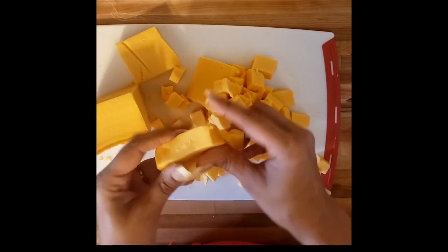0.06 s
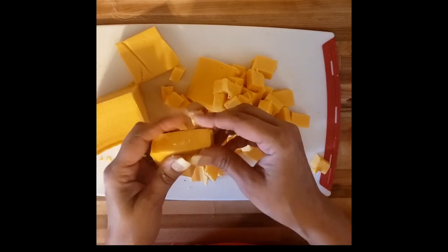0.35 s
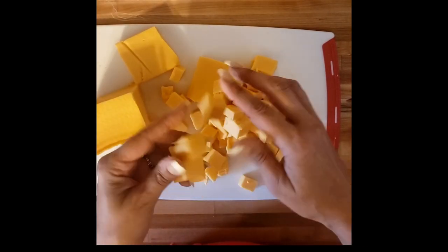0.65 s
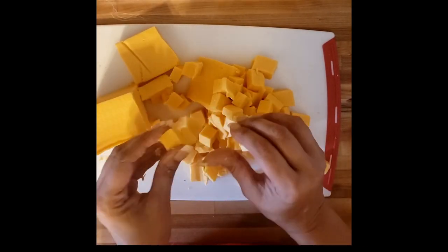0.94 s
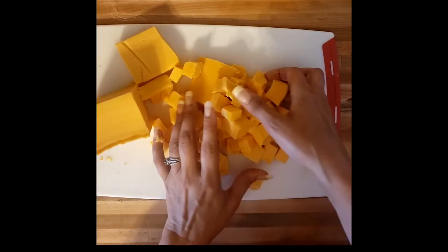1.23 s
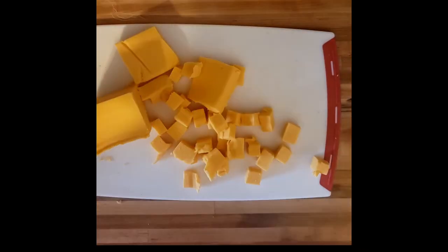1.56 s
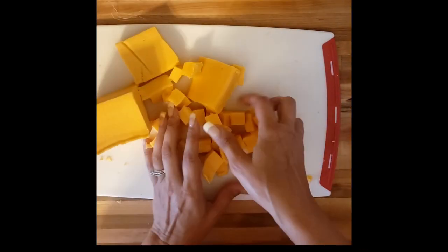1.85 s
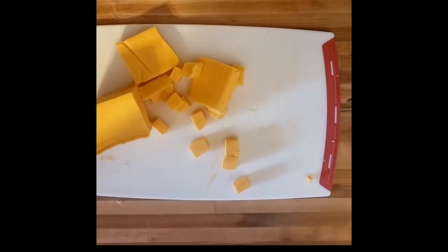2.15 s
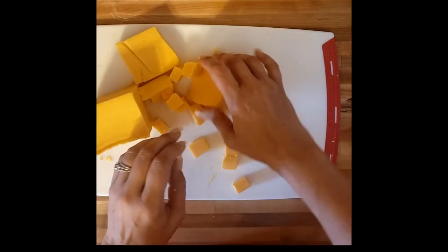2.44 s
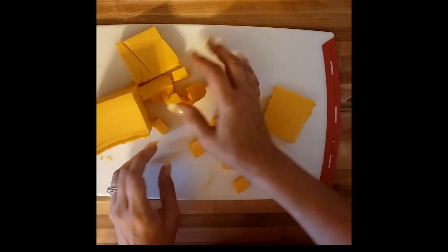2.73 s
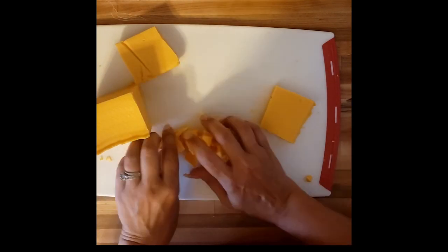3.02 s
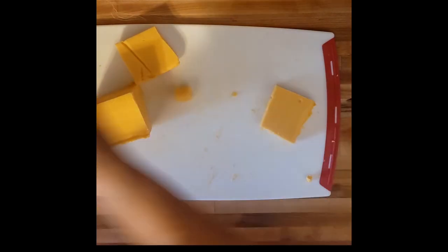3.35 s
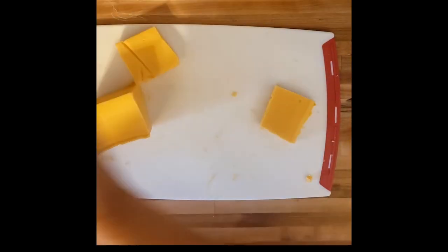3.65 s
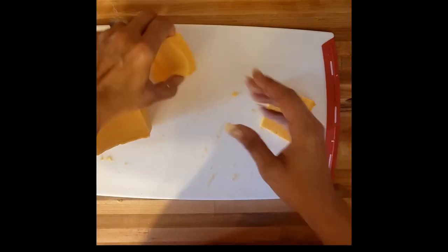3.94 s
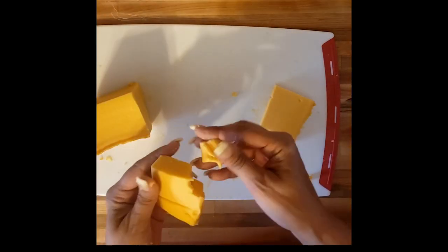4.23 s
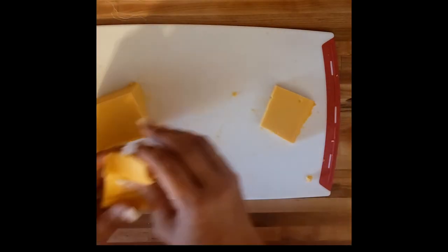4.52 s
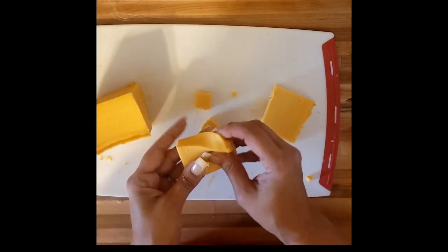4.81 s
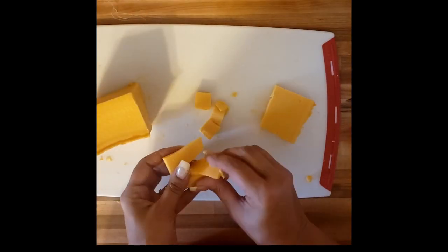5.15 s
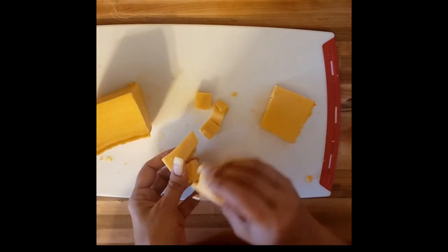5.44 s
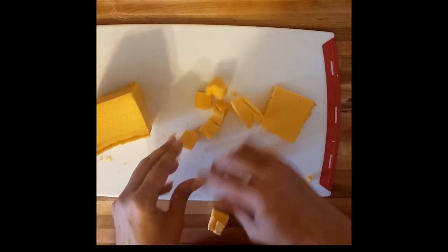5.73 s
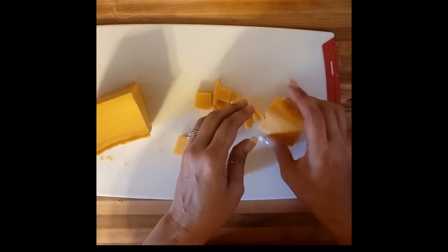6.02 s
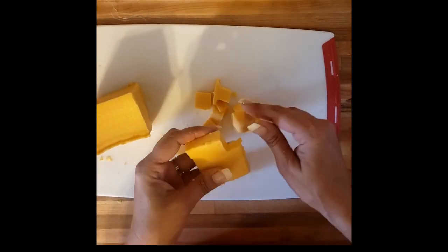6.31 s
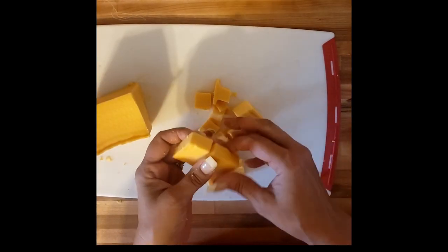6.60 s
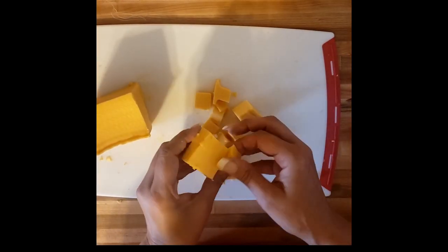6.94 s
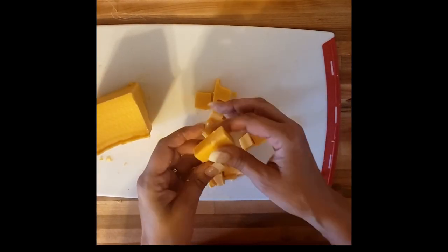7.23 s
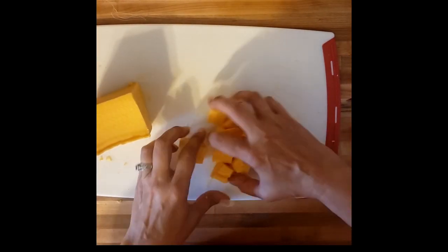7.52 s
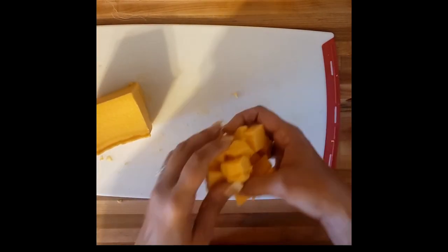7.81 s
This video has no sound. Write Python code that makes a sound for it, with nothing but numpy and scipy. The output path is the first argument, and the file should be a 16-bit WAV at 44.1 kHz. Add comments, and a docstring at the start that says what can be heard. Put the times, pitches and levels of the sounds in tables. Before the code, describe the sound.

Close to a cutting board on a wooden counter, hands quietly work soft cheese cubes: clusters of moist little slaps, brief sticky peels, faint squeaky slides and low thumps. The landings grow sparse after four seconds, then return in a short jostle near the end. Under it all, a motor hums and pulses without stopping, its bass shifting between centred and wide, hollow stereo.

```python
"""Close on a plastic cutting board on a wooden counter, two microphones, hands working soft cheese cubes.
A machine hums and throbs from the start, its bass jumping between the centre and a wide, hollow image.
After a second, cubes land in soft, blurred taps, sticky faces peel apart and fingers brush the board.
From four seconds the landings thin out among dull bumps on the counter; near seven and a half the heap
is shoved together and a last few cubes drop."""
import sys
import numpy as np
from scipy import signal
from scipy.fft import rfft, irfft, next_fast_len
from scipy.io import wavfile
from scipy.ndimage import uniform_filter1d

SR = 44100
rng = np.random.default_rng(int(sys.argv[2]) if len(sys.argv) > 2 else 0)


def transcribe(u):
    """Save the signal u as a 16-bit wav file named by the first command-line argument.

    u: samples, shape (n,) or (channels, n), limited to [-1, 1]; the rate is SR.
    q: integer samples, one column per channel.
    """
    v = np.clip(np.atleast_2d(u).T, -1, 1)
    q = np.round(v * 32767).astype(np.int16)
    wavfile.write(sys.argv[1], SR, q)


N = 351477
TIME = np.arange(N) / SR

# Spectra of cheese meeting the board: the slap of its face, the thock of its weight, its moist smack.
# Each row: frequency in Hz, relative level in dB.
SLAP_SPECTRUM = [(700, -36), (1150, -7), (1500, 0.5), (2400, 3), (3100, -1.5), (4400, -3), (5200, -12.5),
                 (7500, -21.5), (12000, -51.5)]
THOCK_SPECTRUM = [(100, -11), (250, 12.5), (480, -2), (800, -5), (1100, -1), (1500, -12.5), (3000, -40.5)]
SMACK_SPECTRUM = [(3000, -26.5), (5200, -2), (7500, 0.5), (10000, -4.5), (12500, 1), (16000, 1.5)]


def undb(db):
    """Decibels to gain."""
    return 10 ** (np.asarray(db) / 20)


def unit(x):
    """Scale to rms 1."""
    return x / np.sqrt(np.mean(x ** 2))


def contour(points, hz):
    """Gain at each frequency from (Hz, dB) points."""
    knots, db = np.transpose(points)
    return undb(np.interp(np.log(hz + 1), np.log(knots), db))


def resonance(hz, centre_hz, width_hz):
    """Complex response of one mode, 1 at its centre."""
    return 1j * hz * width_hz / (centre_hz ** 2 - hz ** 2 + 1j * hz * width_hz)


def shape(x, response):
    """Filter by a response given as a function of frequency."""
    size = next_fast_len(x.shape[-1])
    hz = np.fft.rfftfreq(size, 1 / SR)
    return irfft(rfft(x, size) * response(hz), size)[..., :x.shape[-1]]


def board(hz):
    """The plastic sheet: a broad response with damped modes on top."""
    # The ring of the board. Each row: frequency in Hz, width in Hz, gain in dB.
    modes = [(780, 35, -2.5), (1140, 180, -4.5), (1530, 100, 1), (1857, 27, -6.5), (2077, 33, -4.5),
             (2530, 120, -14.5), (3720, 130, -12.5), (4090, 77, -4)]
    return 1 + sum(undb(db) * resonance(hz, centre, width) for centre, width, db in modes)


def add_contact(out, at, rise_s, fall_s, db, response, grain_db, likeness=0):
    """Mix in one soft contact: countless tiny grabs, swelling as faces meet and fading as they settle."""
    span = np.arange(max(int((at - .12) * SR), 0), min(int((at + .2) * SR), N))
    lag = TIME[span] - at
    onset = np.exp(-(np.minimum(lag, 0) / (5.1 * rise_s)) ** 4)
    pressure = 2 * onset * np.exp(-np.logaddexp(-lag / rise_s, lag / fall_s))
    noise = rng.standard_normal((4, SR // 3))[:, :len(span)]  # shared, left, right, grab strength
    grabs = noise[:3] * undb(grain_db * noise[3])
    stereo = np.sqrt(likeness) * grabs[:1] + np.sqrt(1 - likeness) * grabs[1:]
    # cupped hands throw the sound back a moment later, colouring each contact differently
    echo_s = rng.uniform(0.001003, .003)
    sound = shape(stereo, lambda hz: response(hz) * (1 + .57 * np.exp(-2j * np.pi * hz * echo_s)))
    out[:, span] += undb(db) * unit(pressure * sound) * np.sqrt(np.mean(pressure ** 2))


def landings(tock_db=-1, tock_width_hz=190, cling_doubling_db=28, grain_db=7):
    """A landing cube slaps the board; a heavy one adds a low thock, a moist one a bright smack."""
    # A dropped cube rises fast, a pressed one slowly. Each row: time in seconds, rise in seconds,
    # slap level in dB, tock pitch in Hz, then weight and tackiness in dB relative to the slap.
    cubes = [(1.167, .0038, -50.5, 2350, -19.5, -10.5), (1.189, 0.0041, -51.5, 1550, -12, -8.5),
             (1.241, 0.0074, -48, 1490, -13.5, -16.5), (1.272, .008, -51.5, 3020, -7.5, -14),
             (1.351, .005, -47.5, 2380, -9, -8.5), (1.836, .005, -42.5, 1800, -7, -12),
             (1.907, 0.01, -46, 1960, -1, -7), (2.096, .0015, -59.5, 1500, -5.5, -33),
             (2.274, 0.0036, -57.5, 2040, -8, -32), (2.498, 0.0056, -47.5, 1470, -26, -19),
             (2.668, 0.0025, -46, 1220, 0.5, 0), (2.725, 0.00072, -63, 1520, -7.5, -1.5),
             (2.799, 0.0033, -47.5, 1750, -14.5, -10.5), (2.957, 0.0054, -64, 2390, -18, -13),
             (2.982, 0.0031, -49.5, 2000, -15, -11), (3.03, 0.0063, -50, 2650, -9.5, -19),
             (3.093, .008, -53, 1550, 0, -21), (3.122, 0.0045, -48.5, 1750, -4, -21),
             (3.263, 0.015, -68, 690, 4.5, -4.5), (3.649, .004, -67.5, 1420, -16, -24),
             (3.908, 0.0076, -57.5, 2080, -0.5, -4), (4.733, 0.0026, -64, 2000, -6, -17.5),
             (5.545, 0.0043, -68, 1900, -9, -8), (5.76, .003, -72.5, 560, 17, -25),
             (6.019, 0.003, -41.5, 1550, -12, 3), (7.548, .008, -44, 2000, -8, -21.5),
             (7.6, 0.0068, -44.5, 2460, -11, -26), (7.732, .0048, -41.5, 1700, -13, -8.5),
             (7.813, 0.013, -58, 2350, -11, -12)]
    out = np.zeros((2, N))
    for at, rise, db, pitch_hz, weight_db, tack_db in cubes:
        fall = .012 * 2 ** (tack_db / cling_doubling_db)  # a tacky cube clings longer
        # harder and tackier landings are brighter
        tilt_db_per_octave = -1.3 + .26 * (db + 50.5) + .18 * (tack_db + 14)

        def spot(hz):
            """Each place on the board favours one mode, the pitch of the tock."""
            tock = undb(tock_db) * np.abs(resonance(hz, pitch_hz, tock_width_hz)) ** 2
            return np.abs(board(hz)) * (1 + tock)

        def slap(hz):
            """The face strikes that spot, its spectrum tilted by the landing."""
            octaves = np.log2(np.clip(hz, 1200, 5000) / 2300)
            return spot(hz) * contour(SLAP_SPECTRUM, hz) * undb(tilt_db_per_octave * octaves)

        add_contact(out, at, rise, fall, db, slap, grain_db)
        add_contact(out, at, rise, fall, db + weight_db,
                    lambda hz: spot(hz) * contour(THOCK_SPECTRUM, hz), grain_db)
        # the smack dies sooner than the board
        add_contact(out, at, rise, .9 * fall, db + tack_db,
                    lambda hz: contour(SMACK_SPECTRUM, hz), grain_db)
    return out


def shoves(rise_s=.025, fall_s=.026, weight_db=-8, tack_db=-10, grain_db=6.5):
    """Cubes in a pushed heap jostle in a blur of small slaps, thocks and smacks."""
    # Pushes on the heap. Each row: time in seconds, slap level in dB.
    pushes = [(1.328, -59.5), (1.945, -61.5), (3.075, -61.5), (7.577, -56.5)]
    out = np.zeros((2, N))
    for at, db in pushes:
        add_contact(out, at, rise_s, fall_s, db,
                    lambda hz: board(hz) * contour(SLAP_SPECTRUM, hz), grain_db)
        add_contact(out, at, rise_s, fall_s, db + weight_db,
                    lambda hz: board(hz) * contour(THOCK_SPECTRUM, hz), grain_db)
        add_contact(out, at, rise_s, fall_s, db + tack_db,
                    lambda hz: contour(SMACK_SPECTRUM, hz), grain_db)
    return out


def peels(board_db=-17, grain_db=6):
    """Sticky faces let go in a short, high crackle; a little of it reaches the board."""
    # Cubes pulled apart. Each row: time in seconds, fall in seconds, level in dB.
    partings = [(1.684, 0.011, -52.5), (2.271, 0.0084, -52), (3.464, 0.0089, -53.5), (5.019, .004, -63),
                (5.545, 0.0048, -64.5), (5.587, 0.0044, -50.5), (6.125, .0035, -62), (6.168, .005, -53),
                (7.904, 0.018, -65)]
    # The crackle's spectrum. Each row: frequency in Hz, relative level in dB.
    crackle = [(2500, -20), (5000, -14), (8000, -11), (11000, -0.5), (13500, 4), (15500, 1)]
    out = np.zeros((2, N))
    for at, fall, db in partings:
        add_contact(out, at, fall / 2, fall, db, lambda hz: contour(crackle, hz), grain_db)
        add_contact(out, at, fall / 2, fall, db + board_db,
                    lambda hz: board(hz) * contour(SLAP_SPECTRUM, hz), grain_db)
    return out


def slides(squeak_width_hz=380, grain_db=4):
    """Dry skin hisses over the board; a dragged cube sticks and slips around one pitch."""
    # Skin and cheese sliding. Each row: time in seconds, half length in seconds, level in dB.
    brushes = [(1.125, 0.028, -67.5), (1.5, 0.015, -69), (1.638, 0.015, -69), (2.426, 0.014, -59.5),
               (2.463, 0.02, -62.5), (3.36, .032, -68.5), (3.889, 0.028, -62), (3.94, .014, -62),
               (4.354, 0.014, -65.5), (4.595, 0.019, -59)]
    # The spectrum of a brush. Each row: frequency in Hz, relative level in dB.
    hiss = [(1500, -7.5), (4000, -13.5), (7000, -10), (10000, -9), (12500, -1.5), (16000, 2.5)]
    # Faintly squeaking cubes. Each row: time in seconds, half length in seconds, pitch in Hz, level in dB.
    drags = [(.65, .014, 750, -69.5), (1.973, 0.0078, 1750, -60.5), (1.995, 0.015, 1260, -61),
             (2.626, .007, 1500, -64.5), (2.876, .012, 1860, -68), (3.168, .017, 1330, -63),
             (3.203, 0.014, 1560, -58), (3.31, 0.011, 1640, -66), (4.051, 0.011, 1250, -71),
             (4.641, .013, 1580, -67), (5.809, 0.0081, 1500, -63)]
    out = np.zeros((2, N))
    for at, half_s, db in brushes:
        add_contact(out, at, half_s, half_s, db, lambda hz: contour(hiss, hz), grain_db)
    for at, half_s, pitch_hz, db in drags:
        add_contact(out, at, half_s, half_s, db,
                    lambda hz: resonance(hz, pitch_hz, squeak_width_hz) ** 2, grain_db)
    return out


def fingertips(gain_db=-2, rise_s=.0035, fall_s=.012, pitch_hz=3900, grain_db=5):
    """Fingertips meet and leave the cheese in faint, broad ticks."""
    # Light touches. Each row: time in seconds, relative level in dB.
    touches = [(.406, -82), (.583, -83), (1.099, -73.5), (3.85, -75.5), (4.34, -76)]
    out = np.zeros((2, N))
    for at, db in touches:
        add_contact(out, at, rise_s, fall_s, db + gain_db,
                    lambda hz: resonance(hz, pitch_hz, width_hz=pitch_hz) ** 2, grain_db)
    return out


def counter_thumps(gain_db=3, rise_s=.0082, fall_s=.013):
    """The counter answers each bump with a few slow cycles, alike at both microphones."""
    # Hands and cubes bumping the counter. Each row: time in seconds, relative level in dB.
    bumps = [(1.016, -41), (1.096, -42.5), (1.239, -41), (1.833, -36), (1.912, -36.5), (2.678, -34),
             (3.007, -45.5), (3.135, -44), (3.2, -39.5), (3.245, -35.5), (3.395, -45.5), (4.753, -37.5),
             (5.123, -40.5), (5.337, -40), (5.549, -43.5), (5.785, -48), (5.928, -47), (6.032, -46.5),
             (6.381, -44.5), (7.093, -46), (7.297, -45), (7.448, -43), (7.685, -44.5)]
    # The counter's spectrum. Each row: frequency in Hz, relative level in dB.
    wood = [(15, -15), (35, -1.5), (65, 11), (110, 3), (180, 4), (300, -31), (600, -66.5), (2000, -100)]
    out = np.zeros((2, N))
    for at, db in bumps:
        add_contact(out, at, rise_s, fall_s, db + gain_db,
                    lambda hz: contour(wood, hz), grain_db=0, likeness=1)
    return out


def air(shared_below_hz=285, bass_likeness=.88):
    """Noise of 0 dB per Hz whose long waves reach both microphones nearly alike."""
    def likeness(hz):
        return bass_likeness / (1 + (hz / shared_below_hz) ** 6)
    shared = shape(rng.standard_normal(N), lambda hz: np.sqrt(likeness(hz)))
    separate = shape(rng.standard_normal((2, N)), lambda hz: np.sqrt(1 - likeness(hz)))
    return np.sqrt(SR / 2) * (shared + separate)


def machine(hum_hz=119.4, hum_db=-42, throb_hz=6.28, throb_peak_s=.064, room_db=-.5, flicker_db=2.9):
    """A motor hum that throbs evenly, over fan noise and the narrow ring of its housing."""
    # The housing's resonances. Each row: frequency in Hz, half width in Hz before squaring, level in dB.
    housing_modes = [(189.65, 5.6, -53), (603.2, 10.9, -72.5), (1102, 16, -85), (1532, 37, -91),
                     (1828, 22, -93.5)]
    # Air and fan noise in the room. Each row: frequency in Hz, relative density in dB.
    fan_spectrum = [(15, -87), (35, -78.5), (130, -75.5), (222, -72.5), (300, -87), (420, -88.5),
                    (520, -97), (750, -106), (1150, -106), (1700, -109), (2500, -118), (7500, -128.7),
                    (12000, -120), (15500, -116)]

    def wander(rate_hz):
        return unit(shape(rng.standard_normal(N), lambda hz: np.exp(-hz / rate_hz)))

    throb_depth = np.array([[.3], [.23]])  # left, right
    throb = throb_depth * np.cos(2 * np.pi * throb_hz * (TIME - throb_peak_s))
    waver = .076 * wander(rate_hz=4.4)
    hum = undb(hum_db) * np.sqrt(2) * (1 + throb + waver) * np.sin(2 * np.pi * hum_hz * TIME)
    flow = air()
    housing = sum(undb(db) * unit(shape(flow, lambda hz: resonance(hz, centre, 2 * half_width) ** 2))
                  for centre, half_width, db in housing_modes)
    room = undb(room_db) * shape(air(), lambda hz: contour(fan_spectrum, hz))
    # the very top of the hiss flickers
    treble = shape(room, lambda hz: (hz / 9000) ** 4 / (1 + (hz / 9000) ** 4))
    flicker = undb(flicker_db * wander(rate_hz=7)) - 1
    return hum + housing + room + treble * flicker


def scene():
    """Cheese handled close by, the machine behind it."""
    return landings() + shoves() + peels() + slides() + fingertips() + counter_thumps() + machine()


def record(dry, fade_s=.008, bass_below_hz=255, jump_s=.032, top_hz=15900):
    """The bass jumps between centred and wide, the left carries more of the mids, and the top is cut."""
    # Places where the bass settles. Each row: start in seconds, lead of left over right in radians.
    bass_jumps = [(0, .75), (1.265, 2.97), (1.92, 2.68), (2.722, .1), (3.145, 2.5), (4.765, .12),
                  (6.035, -1.7), (7.09, -2.75), (7.44, .8), (7.62, -1.5), (7.74, 2.5)]
    # The balance of the two microphones. Each row: frequency in Hz, left minus right in dB.
    balance = [(120, 0), (210, -3), (300, -6), (400, 3), (500, 5), (610, -2.5), (740, 10), (1100, 5.5),
               (1550, 5.5), (2400, 6), (4400, -0.5), (8000, 2), (15000, 3)]
    edge_s = np.minimum(TIME, TIME[-1] - TIME)
    faded = dry * np.sin(np.pi / 2 * np.clip(edge_s / fade_s, 0, 1)) ** 2
    starts, leads = np.transpose(bass_jumps)
    held_lead = leads[np.searchsorted(starts, TIME, side="right") - 1]
    lead = uniform_filter1d(held_lead, int(jump_s * SR))
    bass = shape(faded, lambda hz: 1 / (1 + (hz / bass_below_hz) ** 12))
    analytic_bass = signal.hilbert(bass, next_fast_len(N))[:, :N]
    # near half a cycle of lead the two sides oppose each other and the hum turns hollow
    turned_bass = np.real(analytic_bass * np.exp(.5j * np.array([lead, -lead])))
    heard = shape(faded - bass + turned_bass, lambda hz: contour(balance, hz) ** np.array([[.5], [-.5]]))
    lowpass = signal.ellip(10, .2, 80, top_hz, fs=SR, output="sos")
    return signal.sosfilt(lowpass, heard)


dry = scene()
out = record(dry)
transcribe(out)
```